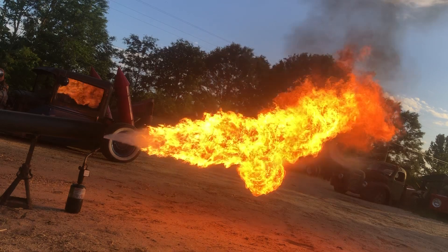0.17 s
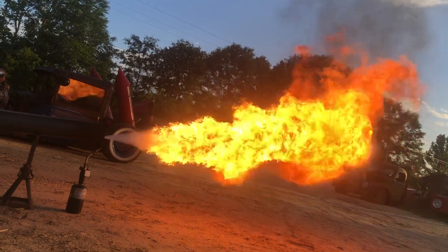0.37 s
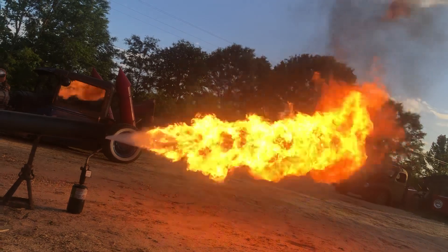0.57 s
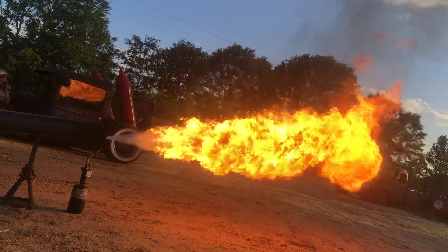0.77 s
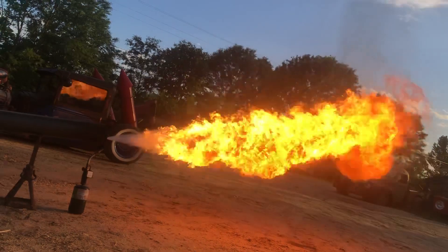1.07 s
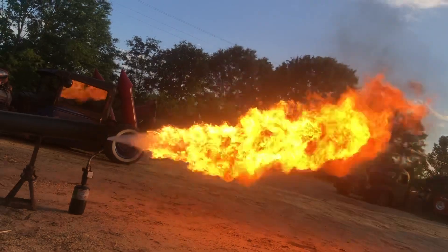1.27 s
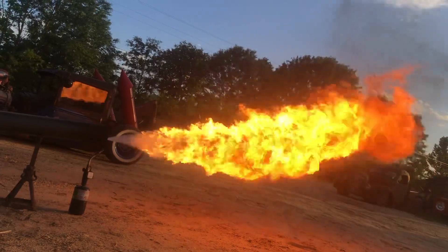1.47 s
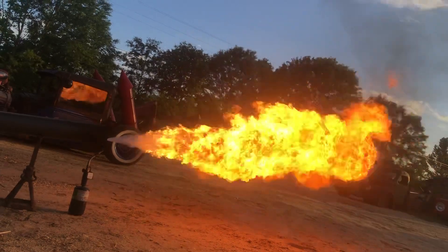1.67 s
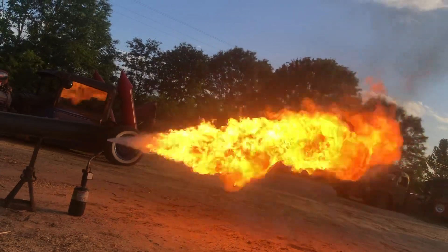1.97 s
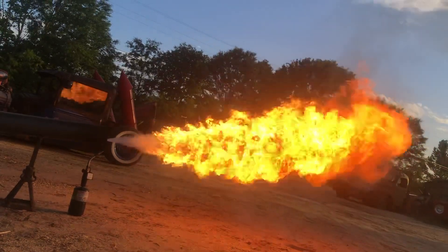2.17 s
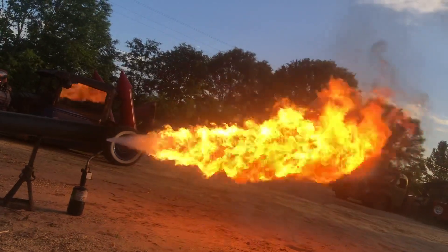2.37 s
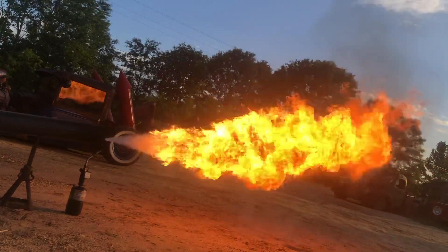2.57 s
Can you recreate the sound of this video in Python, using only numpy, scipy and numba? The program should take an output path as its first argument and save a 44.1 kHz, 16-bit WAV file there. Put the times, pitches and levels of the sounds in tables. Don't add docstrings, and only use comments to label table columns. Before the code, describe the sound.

Loud continuous roar of a big gas burner flame in an open yard, rumbling and hissing

```python
import sys
import numpy as np
from scipy import signal
from scipy.fft import rfft, irfft, next_fast_len
from scipy.io import wavfile
from scipy.ndimage import uniform_filter1d
from numba import njit

SR = 44100
rng = np.random.default_rng(int(sys.argv[2]) if len(sys.argv) > 2 else 0)


def pcm_store(signal):
    levels = np.round(np.clip(np.atleast_2d(signal), -1, 1) * 32767)
    wavfile.write(sys.argv[1], SR, levels.astype(np.int16).T)


def convert_level_to_amplitude(level_db):
    exponent = np.asarray(level_db, float) / 20
    return 10 ** exponent


N = 120393

# time in seconds, tube hum in Hz, hum level in dB,
# burning strength in dB, gas flow in dB.
FLAME_COURSE = [(0.05, 69.4, -36, 0, -0.5), (0.21, 68.65, -25, -1.5, -0.5), (0.32, 64.2, -17, 0.5, 0),
                (0.64, 63.7, -18, -0.5, 0.5), (0.66, 63.8, -25, 1, 2), (0.76, 63.3, -15, 3.5, 2),
                (0.87, 63.2, -22, 3, 0.5), (0.93, 65, -11, 0.5, 1), (1.08, 62.74, -22, 0, 0.5),
                (1.15, 62.83, -21, -1.5, -0.5), (1.22, 65.5, -15, -1, 0), (1.42, 64.34, -14, 1.5, 2),
                (1.62, 65.3, -17.5, 2, 0.5), (1.8, 65.54, -18.5, 0.5, -1), (2.32, 63.6, -20.5, 1.5, 0.5),
                (2.35, 63.3, -14.5, 1.5, 1), (2.5, 65.9, -15, 0.5, 0), (2.72, 65.3, -20, 0.5, 1.5)]
# frequency in Hz, level in dB per Hz.
RUMBLE_COLOUR = [(30, -20), (48, -9.5), (80, -2), (97, 0.5), (160, -1), (245, -8), (300, -11.5), (800, -31)]
# frequency in Hz, level in dB per Hz.
HISS_COLOUR = [(600, -9), (1480, 0.5), (2600, -8.5), (4200, -7.5), (5400, -5), (7500, -5.5), (10000, -7),
               (15600, 0)]
# delay in ms, level in dB, phase shift in turns.
NEAR_PATHS = [(.545, -9.2, .218), (.35, -20.6, .048), (.241, -19.5, -.098), (.612, -17.9, .533)]

RUMBLE_DB, HISS_DB, HUM_DB = -10, -15.5, 4
RUMBLE_FLICKER_DB, HISS_FLICKER_DB, GUST_DB = 1.5, 0.22, 0.02
HUM_WANDER_HZ, HUM_FLUTTER_DB = 1, 0.8
HAZE_DB, HAZE_HZ = -12, 8
PUMP_DB, PUMP_TURNS = 1.3, 0.56
SCATTER_MS, SCATTER_DB = (1.8, 4.8), -25
WALL_MS, WALL_DB, WALL_FROM_HZ = 23.3, -5.5, 300
LOW_HZ, TOP_HZ = 41, 15740
LIMIT_DB, RATIO, OUT_DB = -9.5, 2.38, 0.5
ATTACK_S, RELEASE_S = 0.004, 0.02
CEILING = 1.02
START_S, OPEN_S = 0.0353, 0.003


def level(x, db):
    return x * convert_level_to_amplitude(db) / np.sqrt(np.mean(x ** 2))


def walk(rate):
    hold = int(SR / rate)
    steps = np.repeat(rng.standard_normal(N // hold + 1), hold)[:N]
    drift = uniform_filter1d(uniform_filter1d(steps, hold), hold)
    return (drift - drift.mean()) / drift.std()


def turbulence(colour, flicker_db, rate):
    n = next_fast_len(N, real=True)
    f = np.maximum(np.arange(n // 2 + 1) * SR / n, 1)
    hz, db = np.transpose(colour)
    spectrum = rfft(rng.standard_normal(n)) * convert_level_to_amplitude(np.interp(np.log(f), np.log(hz), db))
    spectrum = spectrum * np.minimum(f / hz[0], 1) ** 2 * np.minimum(hz[-1] / f, 1)
    place = 2 * np.log2(f / 20)
    total = 0
    for band in range(21):
        share = np.clip(1 - abs(place - band), 0, 1)
        total = total + irfft(spectrum * share, n)[:N] * convert_level_to_amplitude(flicker_db * walk(rate))
    return total


def echo(x, ms, db, turns):
    n = next_fast_len(N, real=True)
    f = np.arange(n // 2 + 1) * SR / n
    path = convert_level_to_amplitude(db) * np.exp(-2j * np.pi * (f * ms / 1000 + turns))
    return irfft(rfft(x, n) * path, n)[:N]


def burning_rumble(burn_db):
    return level(turbulence(RUMBLE_COLOUR, RUMBLE_FLICKER_DB, 8.16), RUMBLE_DB) * convert_level_to_amplitude(burn_db)


def gas_hiss(phase, hum_db, gas_db):
    pump_db = PUMP_DB * np.cos(phase - 2 * np.pi * PUMP_TURNS) * convert_level_to_amplitude(hum_db - hum_db.mean())
    hiss = level(turbulence(HISS_COLOUR, HISS_FLICKER_DB, 24.53), HISS_DB)
    return hiss * convert_level_to_amplitude(pump_db + gas_db + GUST_DB * walk(5.7))


def tube_hum(phase, hum_db):
    haze = uniform_filter1d(rng.standard_normal((2, N)), int(SR / HAZE_HZ / 2))
    haze = level(haze[0] * np.sin(phase) + haze[1] * np.cos(phase), HAZE_DB)
    strength = convert_level_to_amplitude(HUM_DB + hum_db + HUM_FLUTTER_DB * walk(9.07))
    return strength * (np.sqrt(2) * np.sin(phase) + haze)


def near_reflections(hiss):
    combed = hiss + sum(echo(hiss, ms, db, turns) for ms, db, turns in NEAR_PATHS)
    delays_ms, phase_turns = rng.uniform(*SCATTER_MS, size=7), rng.random(size=7)
    scatter = sum(echo(combed, ms, SCATTER_DB, turns) for ms, turns in zip(delays_ms, phase_turns))
    return combed + scatter


def far_wall(rumble):
    high_pass = signal.butter(1, WALL_FROM_HZ, "high", fs=SR, output="sos")
    return -echo(signal.sosfiltfilt(high_pass, rumble), WALL_MS, WALL_DB, 0)


def scene():
    t, course = np.arange(N) / SR, np.array(FLAME_COURSE)
    hum_hz, hum_db, burn_db, gas_db = (np.interp(t, course[:, 0], course[:, k]) for k in range(1, 5))
    phase = 2 * np.pi * np.cumsum(hum_hz + HUM_WANDER_HZ * walk(12)) / SR
    rumble = burning_rumble(burn_db)
    rumble = rumble + far_wall(rumble)
    hiss = near_reflections(gas_hiss(phase, hum_db, gas_db))
    hum = tube_hum(phase, hum_db)
    return (rumble + hiss + hum)[None]


@njit
def follow(x, up, down):
    track, now = np.empty(len(x)), x[0]
    for i in range(len(x)):
        now += (x[i] - now) * (up if x[i] > now else down)
        track[i] = now
    return track


def limiter(x):
    loudness = follow(np.abs(x[0]) + 1e-6, 1 / (ATTACK_S * SR), 1 / (RELEASE_S * SR))
    gain = np.minimum(convert_level_to_amplitude(LIMIT_DB) / loudness, 1) ** (1 - 1 / RATIO)
    return x * gain * convert_level_to_amplitude(OUT_DB)


def low_pass(x):
    return signal.sosfilt(signal.butter(12, 16520, fs=SR, output="sos"), x)


def record(dry):
    bass_cut = signal.butter(3, LOW_HZ, "high", fs=SR, output="sos")
    x = limiter(signal.sosfilt(bass_cut, dry))
    x = x / (1 + (x / CEILING) ** 4) ** 0.25
    x = x * np.clip((np.arange(N) / SR - START_S) / OPEN_S, 0, 1)
    top_cut = signal.ellip(14, 0.3, 60, TOP_HZ, fs=SR, output="sos")
    mix = signal.sosfilt(top_cut, x)
    return low_pass(mix)


dry = scene()
out = record(dry)
pcm_store(out)
```